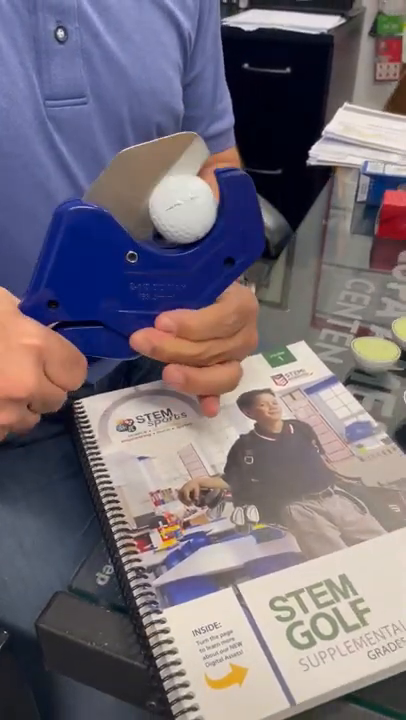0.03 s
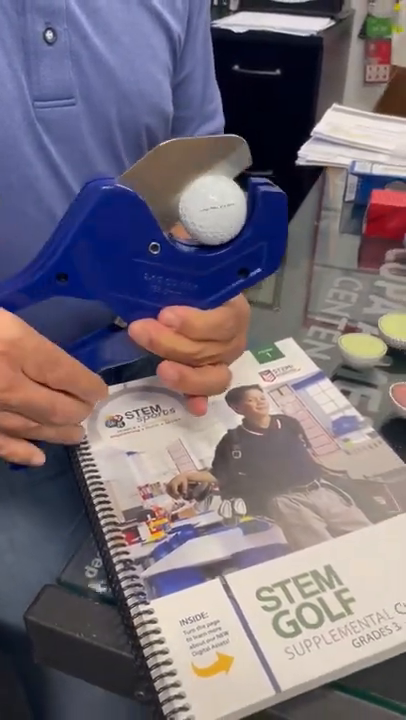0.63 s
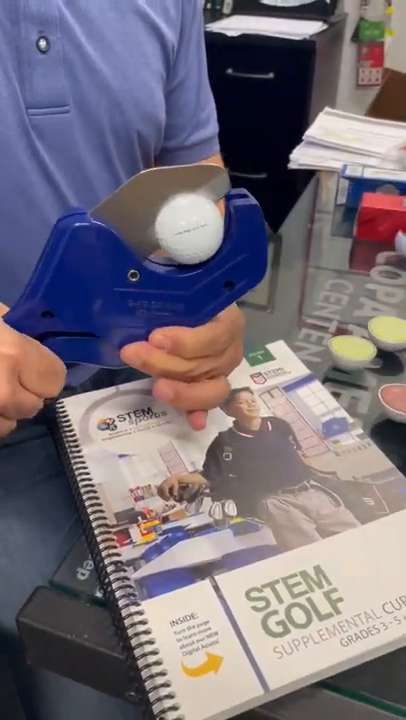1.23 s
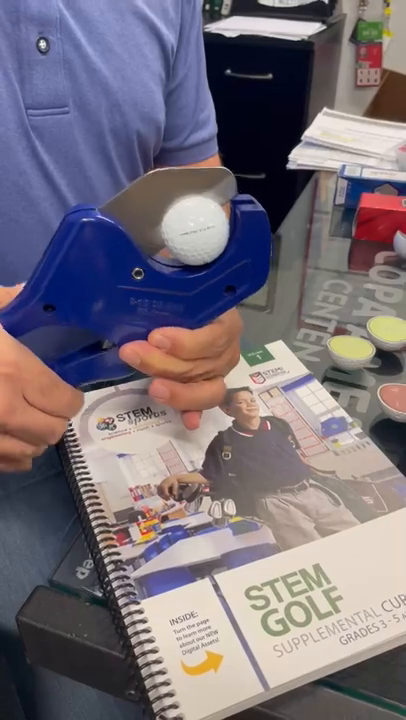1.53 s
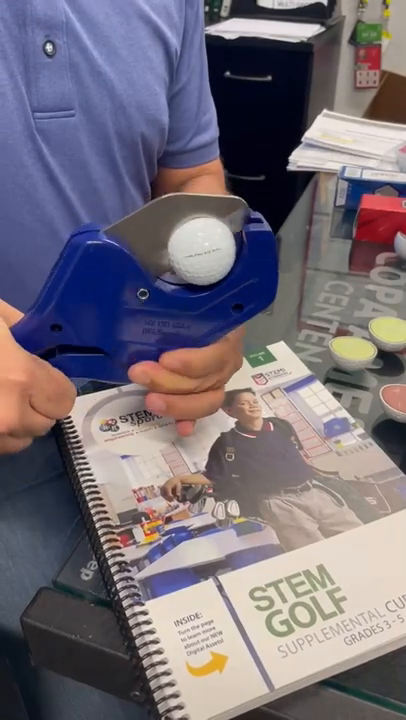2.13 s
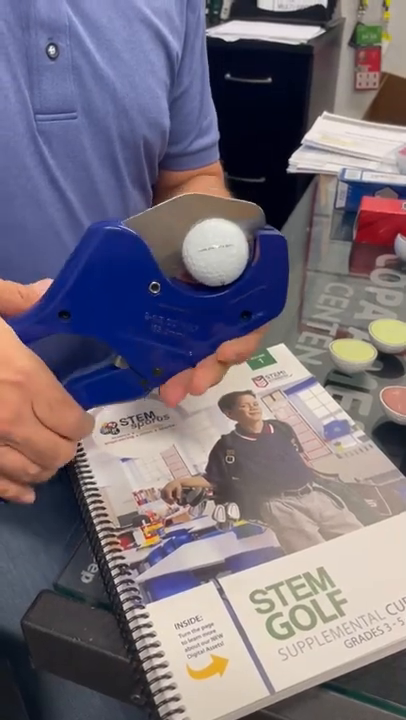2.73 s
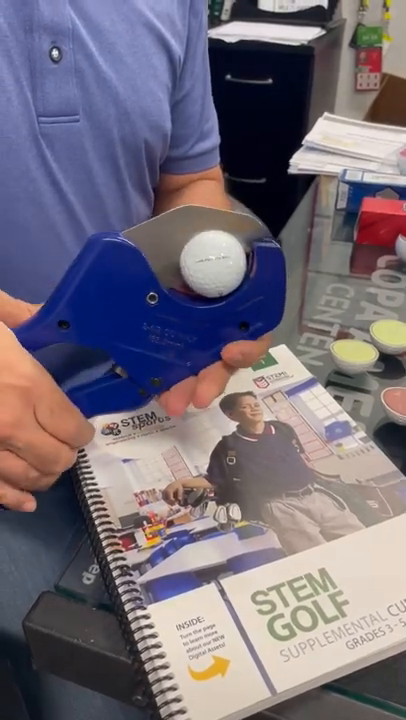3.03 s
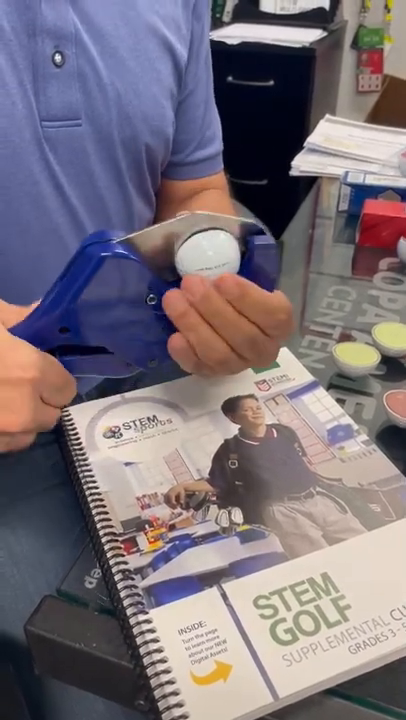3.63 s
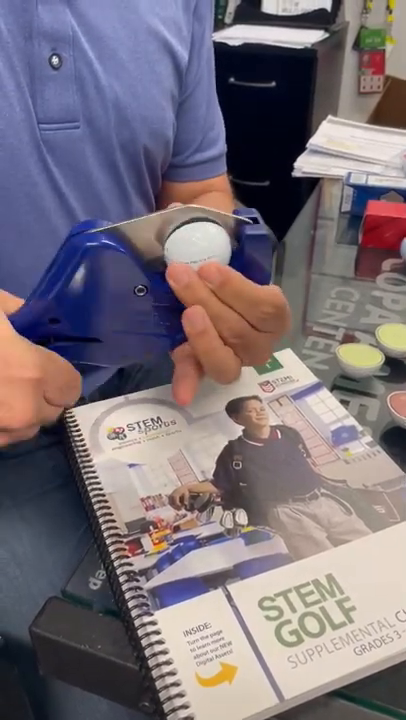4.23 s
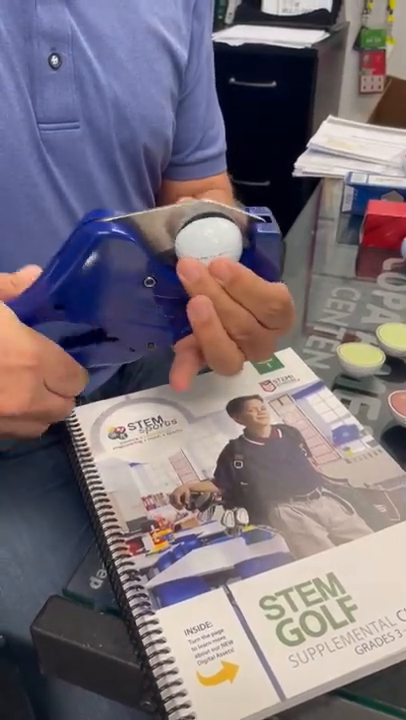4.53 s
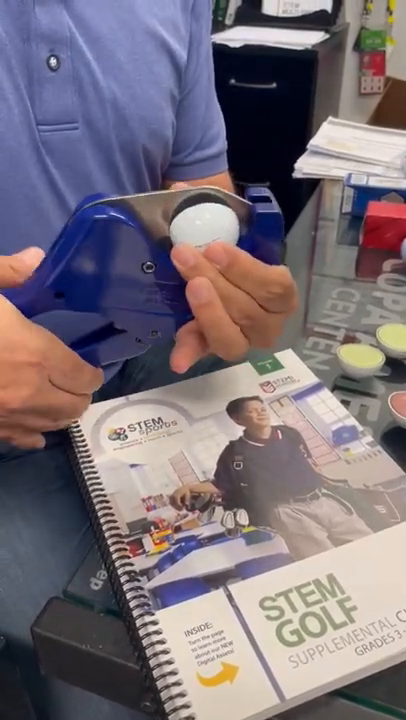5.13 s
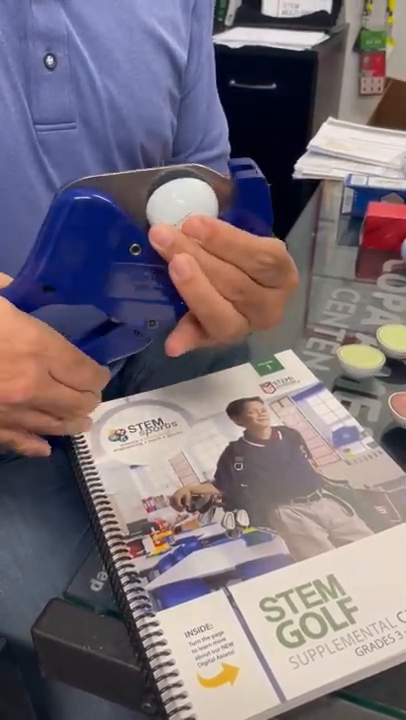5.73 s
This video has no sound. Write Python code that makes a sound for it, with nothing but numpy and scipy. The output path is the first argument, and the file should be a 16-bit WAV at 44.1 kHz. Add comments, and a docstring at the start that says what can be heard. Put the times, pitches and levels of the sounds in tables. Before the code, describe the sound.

A hand-held ratcheting cutter is pumped about seven times, its catch snapping and its handle clacking open, over a faint room hum.

```python
"""A light knock and a ring of steel sound over a faint motor drone: a ratcheting cutter with a plastic
casing is being pumped seven times, close by in a small room. Let go, its handle springs open and slaps
its stop. Squeezed, its pawl (the ratchet's little catch) scrapes over a tooth and snaps in, and the
spring and blade ring on. The later snaps are doubled and hollower."""
import sys
import numpy as np
from scipy import signal
from scipy.fft import rfft, irfft, next_fast_len
from scipy.io import wavfile

SR = 44100
rng = np.random.default_rng(int(sys.argv[2]) if len(sys.argv) > 2 else 0)


def digitize_waveform(pressure):
    """Quantize a signal to 16-bit integers and store it at the path in sys.argv[1].

    Rows of a 2-D input are taken as channels; values are limited to [-1, 1].
    """
    field = np.atleast_2d(pressure).T
    bounded = np.clip(field, -1, 1)
    quanta = np.round(bounded * 32767).astype(np.int16)
    wavfile.write(sys.argv[1], SR, quanta)


N = 263718


def amp(db):
    """Turns decibels into a number to multiply a sound by."""
    return 10 ** (np.asarray(db) / 20)


def unit(x):
    """Scales a sound to an energy of one."""
    return x / np.sqrt(np.sum(x ** 2) + 1e-20)


def read(points, hz):
    """Looks up a frequency in a table, blending between rows along a musical (log) scale."""
    f, value = np.transpose(points)
    return np.interp(np.log(hz + 1), np.log(f + 1), value)


def add(mix, s, sound):
    """Mixes a sound in, starting at s seconds."""
    part = mix[max(round(s * SR), 0):][:len(sound)]
    part += sound[:len(part)]


def waver(length, knots_per_s):
    """A curve that wanders around zero: straight lines between random points (knots)."""
    at = np.arange(length) * knots_per_s / SR
    knots = rng.standard_normal(200)
    return np.interp(at, np.arange(len(knots)), knots)


def colour(x, points, size=4096):
    """Gives a sound the tone in a table, with a filter that never sounds ahead of a hit."""
    log_gain = np.log(amp(read(points, abs(np.fft.fftfreq(size, 1 / SR)))))
    taps = np.fft.ifft(np.exp(np.conj(signal.hilbert(log_gain)))).real
    return signal.fftconvolve(x, taps[:size // 2])[:len(x)]


def ring(modes, t, scatter_db=0):
    """A struck part's own notes (modes) die away, each by 60 dB in its fade time, t60."""
    hz, db, t60 = np.transpose(modes)[:, :, None]
    db = db + scatter_db * rng.standard_normal(hz.shape)
    return (amp(db - 60 * t / t60) * np.sin(2 * np.pi * (hz * t + rng.random(hz.shape)))).sum(0)


def crack(points, rise_s, chatter_s, fall_s):
    """Hard parts chatter together for a few milliseconds, then fall still."""
    t = np.arange(1, SR // 20) / SR
    level = (1 - np.exp(-t / rise_s)) * np.exp(-t / fall_s - (t / chatter_s) ** 2)
    return unit(colour(level * rng.standard_normal(len(t)), points))


# Table levels are relative: each function sets the overall loudness.
# the tone of the air noise: (frequency [Hz], level [dB])
AIR_TONE = [(12, -44), (24, -22.5), (52, 1.5), (85, -7), (125, -2.5), (160, -14), (240, -17), (450, -25),
            (1300, -31), (2000, -44.5), (3600, -51.5), (6000, -70), (9000, -73), (11500, -72),
            (16000, -83.5)]
# the notes of the motor's hum: (pitch [Hz], level [dB])
MOTOR_HUM = [(58.3, -19), (116.7, -3), (175, -18.5), (233.5, -22)]


def drone():
    """Air noise and the slightly wavering hum of a motor somewhere in the room."""
    t, hz = np.arange(N) / SR, np.fft.rfftfreq(N, 1 / SR)
    noise = pair(rfft(rng.standard_normal((2, N))), hz)
    air = irfft(noise * amp(read(AIR_TONE, hz)), N)
    clock = t + np.cumsum(.003 * waver(N, knots_per_s=6)) / SR  # lets the pitch drift
    hum = sum(amp(db) * np.sqrt(2) * np.sin(2 * np.pi * (f * clock + rng.random())) for f, db in MOTOR_HUM)
    hum *= amp(2.2 * waver(N, knots_per_s=8))
    return amp(-43.5 - dips(t)) * (amp(-3.5) * air / air.std() + hum)


# the steel rings while the squeeze is held: (start [s], end [s], low note [dB], high note [dB])
STEEL_RINGS = [(0.0, 0.256, -55.5, -44), (1.092, 1.391, -58.5, -41), (2.156, 2.427, -61, -38.5),
               (3.367, 3.618, -55.5, -47), (4.266, 4.497, -53.5, -57.5), (4.839, 5.12, -62, -61),
               (5.438, 5.72, -59, -49.5)]
# the overtones and two main notes of spring and blade: (pitch [Hz], level [dB], fade time [s])
STEEL_OVERTONES = [(2650, -0.5, 0.3), (4985, 1.5, 0.31), (5410, 1, 0.74), (5370, -2.5, 1.3), (8700, -2, .5),
                   (8800, 2, 1), (9160, 6, .45), (9050, 0.5, 0.34)]
LOW_NOTE, HIGH_NOTE = [(1342, 0.0075, 3.1)], [(1990.7, 0.009, 0.71)]


def steel():
    """Spring and blade ring with two notes and a shimmer until the easing grip quiets them."""
    out, t = np.zeros(N), np.arange(SR // 2) / SR
    for s, end_s, low_db, high_db in STEEL_RINGS:
        notes = amp(low_db) * ring(LOW_NOTE, t) + amp(high_db + 4.5) * ring(HIGH_NOTE, t)
        shimmer = amp(-60) * ring(STEEL_OVERTONES, t) * amp(3.5 * waver(len(t), knots_per_s=60))
        fade_in_out = (1 - np.exp(-t / .015)) * np.clip((end_s - s - t) / 0.026, 0, 1)
        sway = amp(3 * waver(len(t), knots_per_s=34))  # the tool moves in the hand
        add(out, s, fade_in_out * sway * (notes + shimmer))
    return out


# the plastic casing's own notes: (pitch [Hz], level [dB], fade time before damping [s])
CASING_NOTES = [(1072, -4.5, 0.053), (1240, -2.5, 0.04), (1547, 3.5, .03), (1696, -4.5, 0.044),
                (2005, 7.5, 0.024), (2277, 0, 0.029), (2402, -7, 0.031), (2860, -10, 0.0073),
                (3352, -9, 0.043)]


def casing(pitch_hz, focus_db, damping):
    """The hollow casing knocks; notes near the given pitch are boosted, and damping shortens them all."""
    t = np.arange(SR // 10) / SR
    hz, db, t60 = np.transpose(CASING_NOTES)
    db = db + focus_db * np.exp(-(np.log(hz / pitch_hz) / 0.11) ** 2)
    hz = hz * (1 + .015 * rng.standard_normal(len(hz)))  # the grip detunes the notes a little
    notes = ring(np.transpose([hz, db, t60 / damping]), t)
    return unit(notes * (1 - np.exp(-t / 0.0031)))


# loose joints knock into place: (time [s], casing level [dB], crack level [dB])
JOINT_KNOCKS = [(0.0014, -30.5, -28), (0.2472, -31.5, -39.5), (0.792, -29.5, -38.5), (1.1394, -20.5, -20.5),
                (1.877, -30.5, -34.5), (2.1897, -25, -27.5), (2.444, -33, -37.5), (3.236, -37, -46),
                (3.3722, -18.5, -21.5), (3.6297, -38, -28.5), (3.6548, -30.5, -37), (4.0259, -33, -39),
                (4.4801, -31.5, -30), (4.506, -24, -37.5), (4.7302, -19.5, -26), (4.9848, -30, -44),
                (5.013, -24, -27.5), (5.3223, -21.5, -16.5), (5.627, -24, -33), (5.895, -18.5, -20)]
# the dull tone of their crack: (frequency [Hz], level [dB])
KNOCK_TONE = [(200, -16.5), (700, -5.5), (1500, 0), (6000, -6), (9000, -13), (15000, -24.5)]


def joints(touch_lead_s=.007, touch_db=-14):
    """Loose joints touch lightly, then settle with a dull knock as the grip tightens or eases."""
    out = np.zeros(N)
    for s, casing_db, crack_db in JOINT_KNOCKS:
        for at, db in [(s - touch_lead_s, touch_db), (s, 0)]:
            contact = crack(KNOCK_TONE, rise_s=0.0009, chatter_s=0.02, fall_s=0.0058)
            add(out, at, amp(db + crack_db + 10.5) * contact)
            add(out, at, amp(db + casing_db + 11) * casing(1300, focus_db=3, damping=1.7))
    return out


# the tone of the rubbing pivot: (frequency [Hz], level [dB])
PIVOT_TONE = [(200, -24.5), (800, -9.5), (1500, 2.5), (3000, -1), (5000, -5.5), (6500, -15), (9000, -31.5),
              (15000, -29)]


def pivot_rub(growth_s):
    """The pivot rubs louder as the spring speeds the handle up."""
    t = np.arange(-SR // 30, 0) / SR
    return unit(np.exp(t / growth_s) * colour(rng.standard_normal(len(t)), PIVOT_TONE))


# the handle hits its stop: (time [s], crack [dB], casing [dB], thump [dB], ting [dB], drone dip [dB])
HANDLE_SLAPS = [(0.4564, -10.5, -28, -32.5, -26, 2), (1.5997, -11, -25, -31, -49, 2.5),
                (2.8427, -12.5, -26, -25, -35.5, 4.5), (3.8088, -11, -29, -27.5, -48, 9.5),
                (4.588, -10.5, -27.5, -24, -49, 3), (5.1182, -10.5, -30.5, -26.5, -38, 6.5),
                (5.7005, -14, -29.5, -26.5, -44, 17.5)]
# the tone of the slap's crack: (frequency [Hz], level [dB])
SLAP_TONE = [(200, -18.5), (500, -14), (750, -18), (1200, -15), (2500, -3.5), (4000, -3.5), (6300, -0.5),
             (7200, -0.5), (8200, 1), (9600, 3), (10300, -1), (13000, -3.5), (14400, -6), (15400, 4)]
# the ting of the metal stop: (pitch [Hz], level [dB], fade time [s])
TING_NOTES = [(5480, -23, .4), (6160, -12, .12), (10270, -5, .22), (15450, -8, .12)]
# the casing rings on while no hand presses it: (pitch [Hz], level [dB], fade time [s])
LOOSE_NOTES = [(1180, -55, 0.14), (1260, -45.5, 0.27), (1390, -56.5, 0.48), (1606, -52, .22)]


def handle():
    """The handle flies open against its stop: rub, crack, knock, thump and a short ting."""
    out, t = np.zeros(N), np.arange(SR // 4) / SR
    for s, crack_db, casing_db, thump_db, ting_db, _ in HANDLE_SLAPS:
        add(out, s - 1 / 30, amp(crack_db + 1.5) * pivot_rub(growth_s=0.0041))
        add(out, s, amp(crack_db + 22) * crack(SLAP_TONE, rise_s=0.00015, chatter_s=0.0049, fall_s=0.0076))
        add(out, s, amp(casing_db + 20.5) * casing(1356, focus_db=13, damping=1.8))
        add(out, s, amp(thump_db + 28) * thump(lag_cycles=1.42, crest_s=0.0067, spread=0.76))
        add(out, s, amp(ting_db - 1) * ring(TING_NOTES, t))
        add(out, s, ring(LOOSE_NOTES, t, scatter_db=3))
    return out


def thump(lag_cycles, crest_s, spread):
    """A low push whose bass arrives last, so that its pitch falls steeply."""
    log_age = np.log(np.arange(1, SR // 12) / SR / crest_s)
    swell = np.exp(-(log_age / spread) ** 2 / 2)
    return unit(swell * np.sin(2 * np.pi * lag_cycles * log_age - 2))


def dips(t, lowest_after_s=.11, narrowness=2.7):
    """How far the drone sinks after each slap of the handle, in dB: down quickly, back slowly."""
    ages = [(np.maximum(t - s, 0) / lowest_after_s, dip_db) for s, *_, dip_db in HANDLE_SLAPS]
    return sum(dip_db * (age * np.exp(1 - age)) ** narrowness for age, dip_db in ages)


# the pawl slides up a tooth and over its edge: (start [s], end [s], level [dB])
PAWL_SLIDES = [(0.97, 1.107, -41.5), (2.046, 2.153, -40.5), (3.232, 3.354, -36), (4.181, 4.273, -35),
               (4.777, 4.828, -33.5), (5.385, 5.42, -41.5), (5.926, 5.971, -24.5)]
# the tone of its scrape: (frequency [Hz], level [dB])
SCRAPE_TONE = [(300, -12.5), (900, -12), (1500, 3), (2600, 5.5), (3300, -0.5), (4200, -2.5), (5700, 5),
               (7300, -2.5), (9000, 0.5), (12000, -0.5), (14000, -6.5), (15500, -3.5)]


def pawl_scrape(jerks_per_s=90, jerk_s=.0018, jerk_spread_db=3.5):
    """The pawl sticks and slips on a tooth: uneven little jerks, each a short gritty tick."""
    out = np.zeros(N)
    for s, edge_s, db in PAWL_SLIDES:
        t = np.arange(0, edge_s - s, 1 / SR)
        grip_db = -11 * np.exp(-t / 0.027)  # starts soft and grows as the hand closes
        edge_db = 7.5 * np.exp((t - t[-1]) / 0.0098)  # surges near the edge of the tooth
        rate = jerks_per_s * amp(3.3 * waver(len(t), knots_per_s=200))
        slips = np.diff(np.floor(np.cumsum(rate) / SR), prepend=-1)  # 1 at each slip, else 0
        size = amp(jerk_spread_db * np.clip(rng.standard_normal(len(t)), -2, 2))
        jerks = signal.lfilter([1], [1, -np.exp(-1 / (jerk_s * SR))], slips * size)
        rasp = colour((jerks + 0.059) * rng.standard_normal(len(t)), SCRAPE_TONE)
        add(out, s, amp(db + grip_db + edge_db - 5) * np.sqrt(len(t)) * unit(rasp))
    return out


# the pawl catches: (time [s], level [dB])
PAWL_CLICKS = [(0.9837, -37), (1.4481, -42), (2.0555, -30), (2.0937, -19.5), (2.1157, -23.5),
               (3.254, -22.5), (3.3023, -18), (3.602, -37), (3.678, -34.5), (4.2123, -26), (4.2211, -17),
               (4.2496, -16), (4.7808, -25), (4.794, -20.5), (4.9403, -32), (5.3666, -34), (5.3977, -27)]
# the bright tone of its click: (frequency [Hz], level [dB])
CLICK_TONE = [(200, -19.5), (700, -11.5), (1500, -10.5), (6000, 0), (9000, 1.5), (15000, -7)]


def pawl_clicks():
    """The pawl catches on steel: small bright clicks that barely stir the casing."""
    out = np.zeros(N)
    for s, db in PAWL_CLICKS:
        add(out, s, amp(db + 10) * crack(CLICK_TONE, rise_s=0.0016, chatter_s=0.017, fall_s=0.0025))
        add(out, s, amp(db - 0.5) * casing(1500, focus_db=0.5, damping=1.3))
    return out


# the pawl snaps in: (time [s], crack [dB], casing [dB], boosted casing pitch [Hz], hollow knock [dB])
PAWL_SNAPS = [(1.1004, -9.5, -40, 2020, -47), (2.151, -9.5, -27.5, 1894, -39),
              (3.3392, -10.5, -31, 1530, -52), (4.2579, -11, -26, 1226, -50),
              (4.273, -18.5, -26, 1240, -56), (4.8261, -7.5, -19.5, 2510, -33),
              (4.8367, -20, -21.5, 2064, -23), (5.432, -7, -62, 1120, -41), (5.4435, -14.5, -24, 1363, -32),
              (5.9379, -17, -59, 1620, -31), (5.9493, -26, -29.5, 1360, -31),
              (5.954, -9.5, -20.5, 1600, -19), (5.9614, -20, -45, 1310, -35)]
# the tone of the snap's crack: (frequency [Hz], level [dB])
SNAP_TONE = [(100, -6.5), (300, -4.5), (700, -16), (1200, -9), (2500, 1), (4200, -5.5), (5500, 2.5),
             (7200, -1), (8700, 9), (10200, -4.5), (12500, -4), (14000, 3), (15400, -2)]
# the tone of the hollow inside the casing: (frequency [Hz], level [dB])
HOLLOW_TONE = [(100, -21), (350, -31.5), (700, -15), (880, -4), (1000, 7.5), (1120, -7), (1300, -21),
               (3000, -39.5)]


def pawl_snaps():
    """The pawl drops behind a tooth and jolts the casing and the hollow inside it."""
    out = np.zeros(N)
    for s, crack_db, casing_db, pitch_hz, hollow_db in PAWL_SNAPS:
        add(out, s, amp(crack_db + 17) * crack(SNAP_TONE, rise_s=0.00057, chatter_s=0.0053, fall_s=0.0064))
        add(out, s, amp(casing_db + 27) * casing(pitch_hz, focus_db=14, damping=2.27))
        add(out, s, amp(hollow_db + 20.5) * crack(HOLLOW_TONE, rise_s=.0005, chatter_s=.0086, fall_s=.01))
    return out


# how alike the room sounds on the left and right: (frequency [Hz], likeness [0 to 1])
SIDE_LIKENESS = [(250, .98), (700, .3), (4500, .15), (6000, .55), (7200, .99), (8100, .99), (9300, .8),
                 (11000, .95), (15000, .95)]


def pair(spectra, hz):
    """Makes two unrelated sounds partly alike, as room sound is at a microphone's two openings."""
    same = np.clip(read(SIDE_LIKENESS, hz), -1, 1)
    left, other = spectra
    return np.array([left, same * left + np.sqrt(1 - same ** 2) * other])


# how long the room echoes: (frequency [Hz], fade time [s])
ECHO_FADE = [(150, 0.087), (600, 0.65), (1500, 0.65), (5000, 0.57), (9000, 0.67), (15500, 0.31)]
# the tone of the echo: (frequency [Hz], level [dB])
ECHO_TONE = [(100, -28.5), (500, -14), (1400, -8), (3000, -5), (6000, -8), (9000, -12), (13000, -10),
             (15500, -9)]
# how much louder the direct sound is on the left: (frequency [Hz], left minus right [dB])
LEFT_BOOST = [(300, 1.5), (750, 4.5), (1300, 9), (2000, 4.5), (3000, -6), (5000, 0.5), (16000, 0)]
# how far the left side's wave runs ahead of the right's: (frequency [Hz], lead [radians])
LEFT_LEAD = [(100, 0), (450, -.1), (900, -1.5), (1400, -.8), (2000, -1.4), (2700, -.5), (3700, -1.3),
             (4800, -.3), (6000, 1.2), (7600, 3.14), (9000, 4.5), (11000, 6.28), (12500, 7.6),
             (14200, 9.42), (16000, 10.8)]


def room(x):
    """Sound reaches both sides directly, then off nearby surfaces, then as a fading echo."""
    size = next_fast_len(N + SR)
    hz = np.fft.rfftfreq(size, 1 / SR)
    age = np.arange(SR * 3 // 4) / SR
    echoes = rng.standard_normal((2, len(age))) * (rng.random((2, len(age))) < 6000 / SR) * (age > .003)
    echoes *= 1 + amp(17) * np.exp(-age / 0.021)  # strong early bounces off desk and body
    f, t, bands = signal.stft(echoes, SR, nperseg=256)
    tail = signal.istft(bands * amp(-60 * t / read(ECHO_FADE, f)[:, None]), SR, nperseg=256)[1]
    tail_spectra = rfft(np.array([unit(side) for side in tail]), size)
    echo = pair(tail_spectra, hz) * amp(read(ECHO_TONE, hz))
    sides = np.array([[.5], [-.5]])
    direct = amp(sides * read(LEFT_BOOST, hz))
    response = (direct + echo) * np.exp(1j * sides * read(LEFT_LEAD, hz))
    return irfft(rfft(x, size) * response, size)[:, :N]


def scene():
    """The cutter in its room, over the motor's drone."""
    cutter = steel() + joints() + handle() + pawl_scrape() + pawl_clicks() + pawl_snaps()
    return room(cutter) + drone()


def record(dry, ceiling=1.1, top_hz=16100):
    """The microphone rounds off the sharpest peaks, then the very highest treble is cut."""
    rounded = ceiling * np.tanh(dry / ceiling)
    treble_cut = signal.firwin(201, top_hz, window=("kaiser", 8), fs=SR)
    return signal.oaconvolve(rounded, treble_cut[None], "same")


dry = scene()
out = record(dry)
digitize_waveform(out)
```